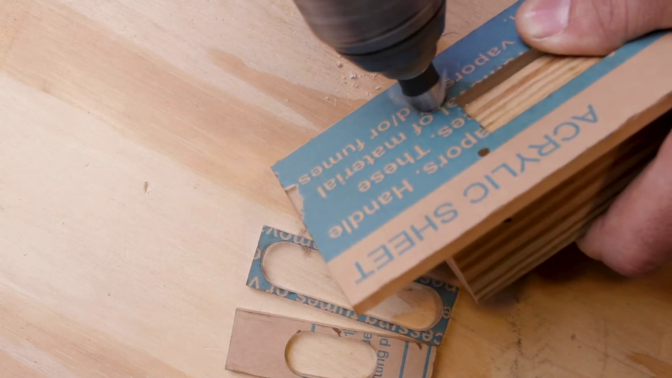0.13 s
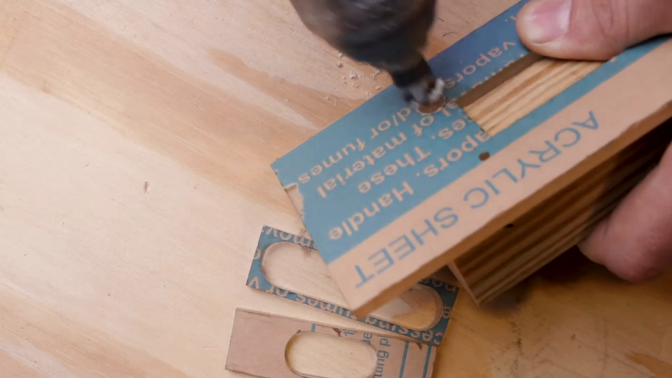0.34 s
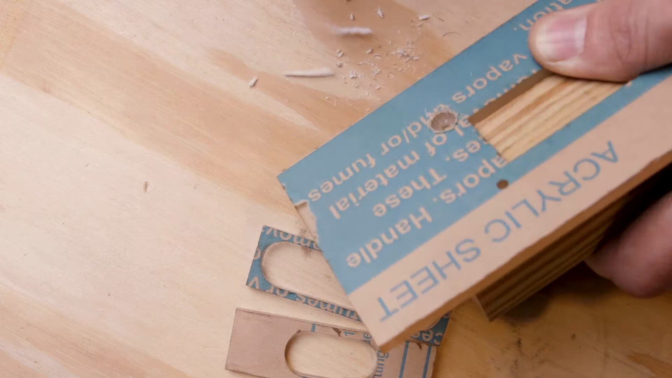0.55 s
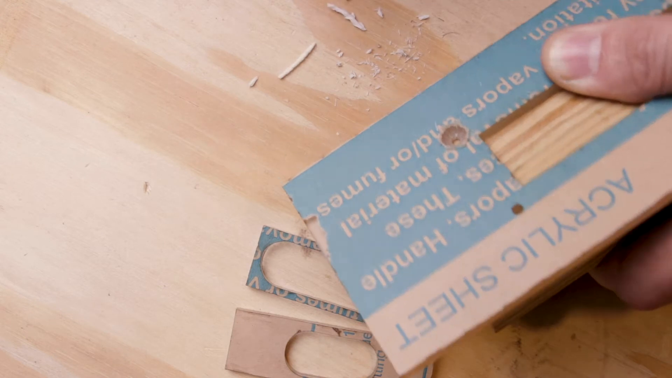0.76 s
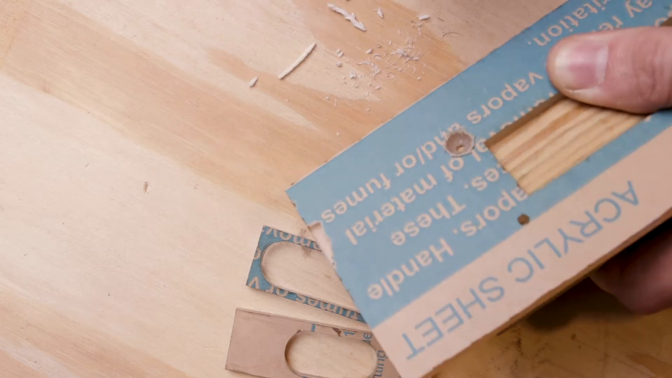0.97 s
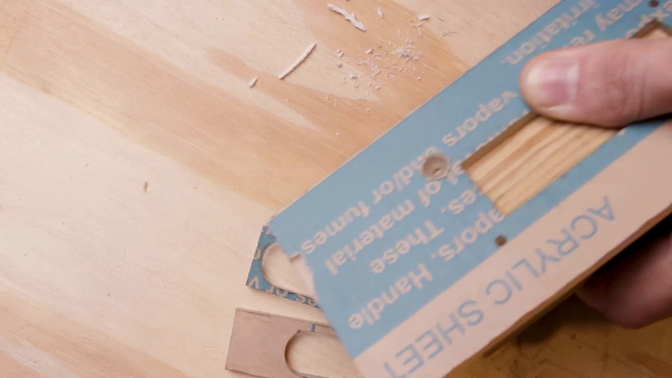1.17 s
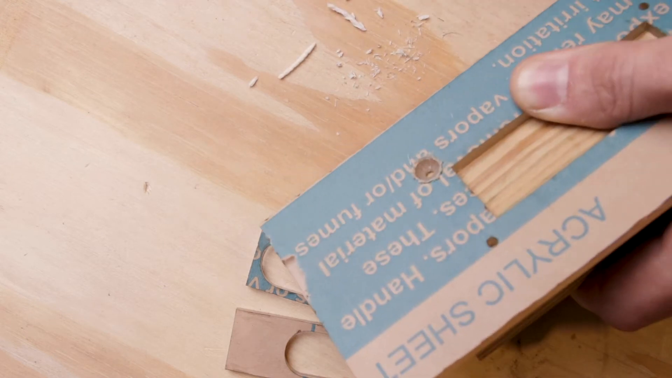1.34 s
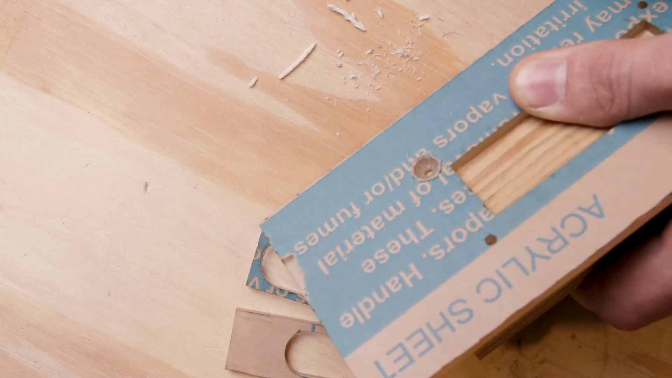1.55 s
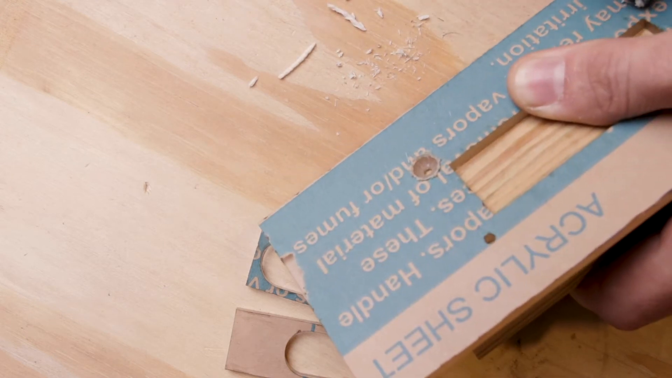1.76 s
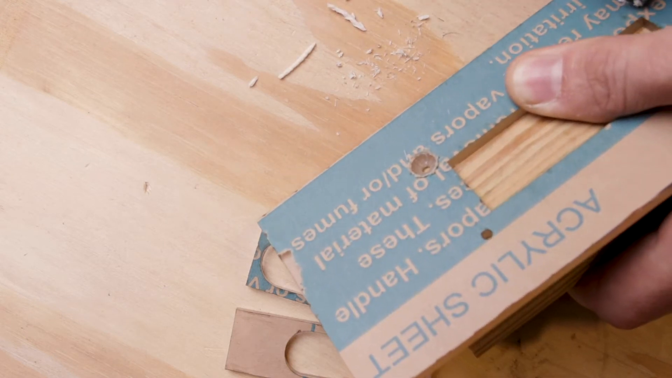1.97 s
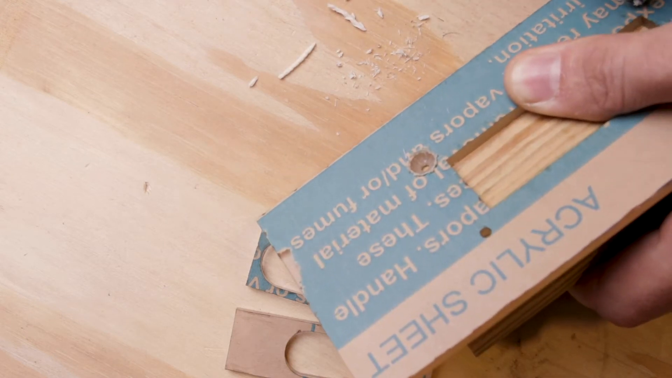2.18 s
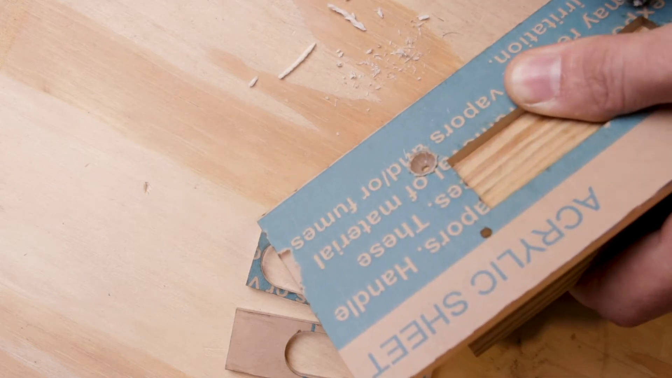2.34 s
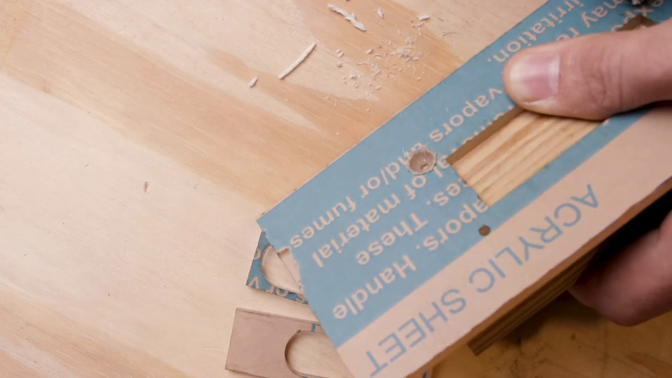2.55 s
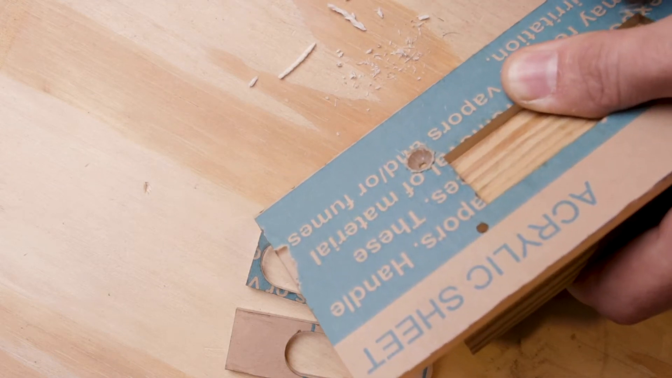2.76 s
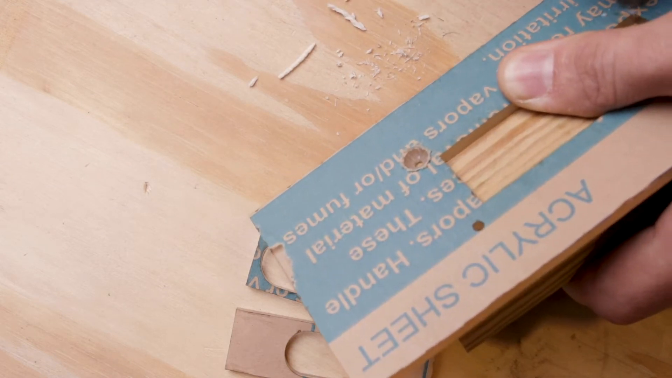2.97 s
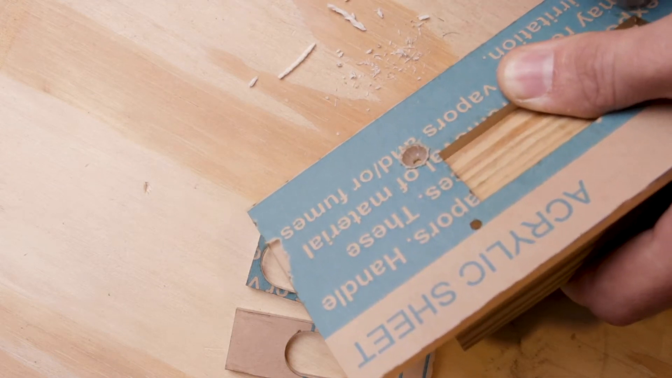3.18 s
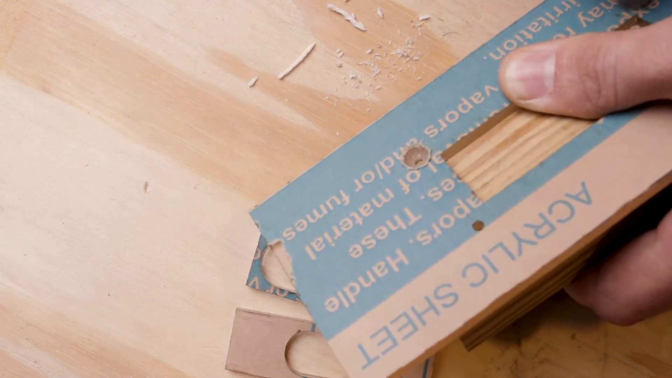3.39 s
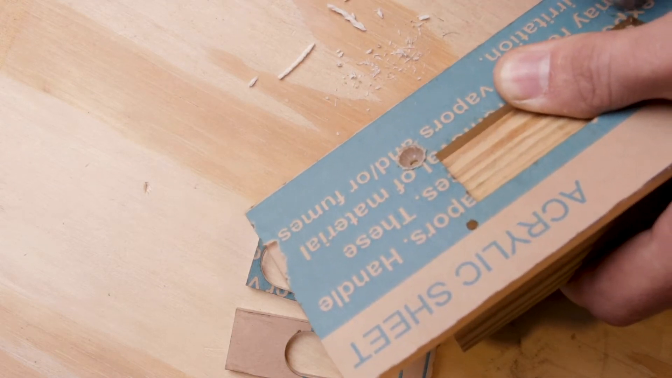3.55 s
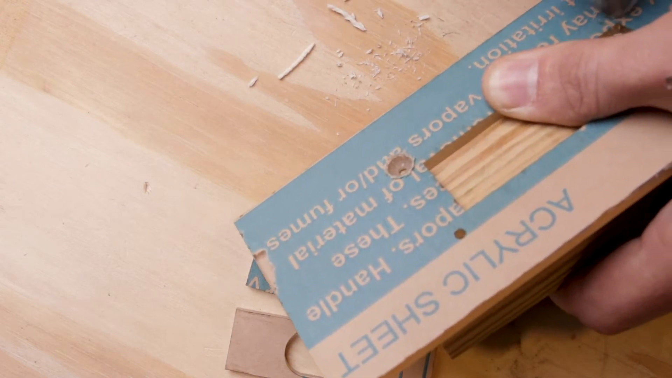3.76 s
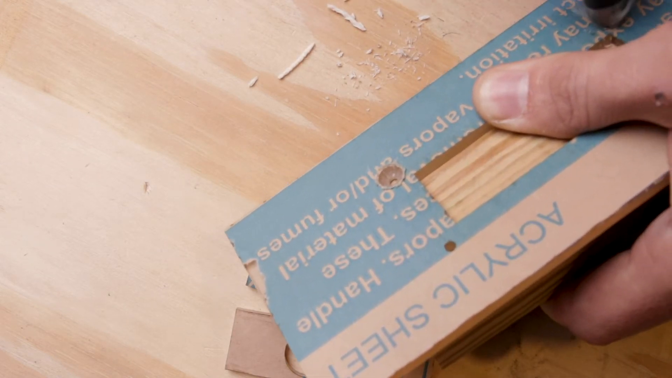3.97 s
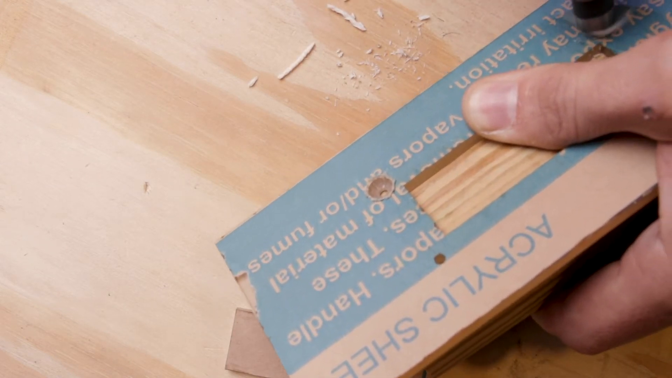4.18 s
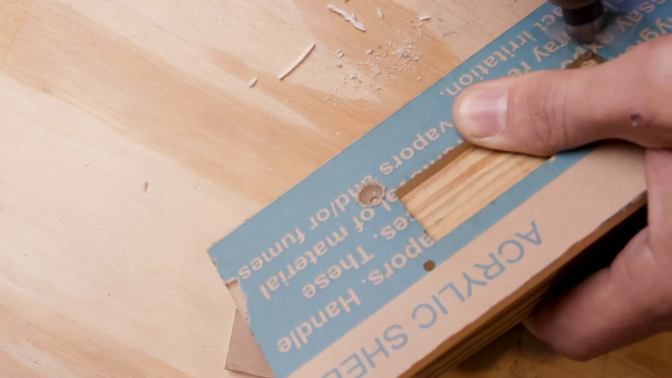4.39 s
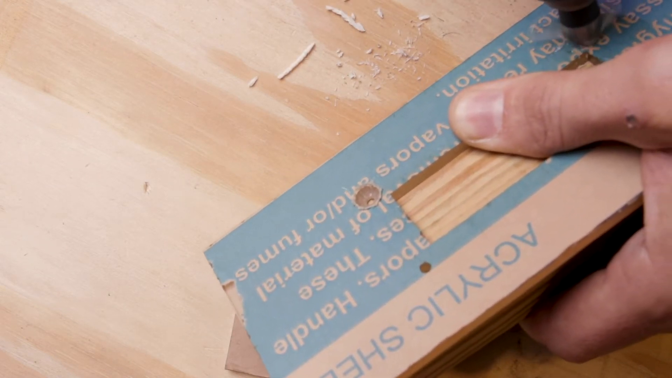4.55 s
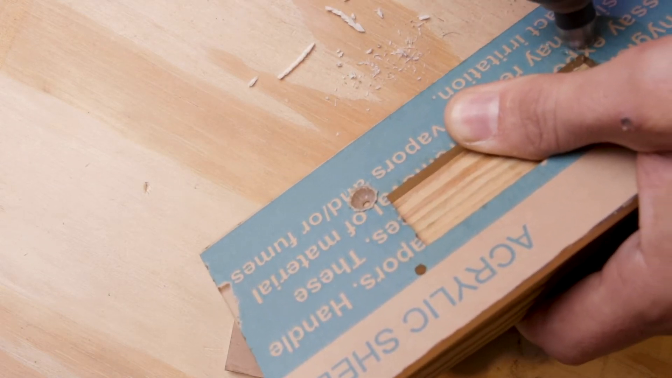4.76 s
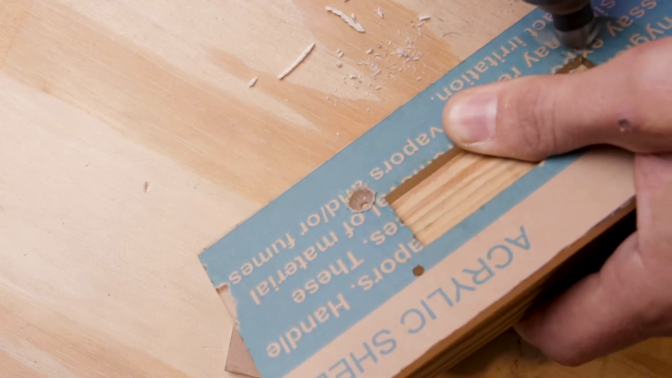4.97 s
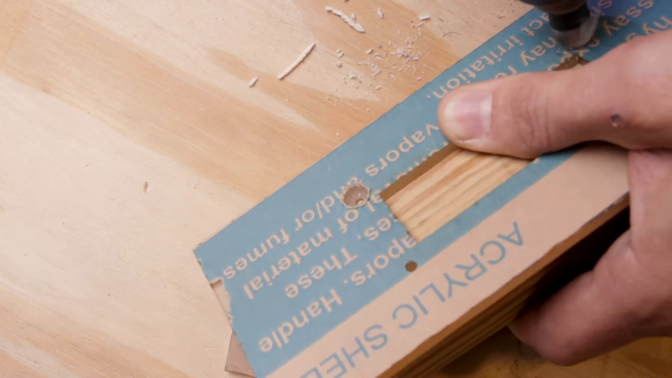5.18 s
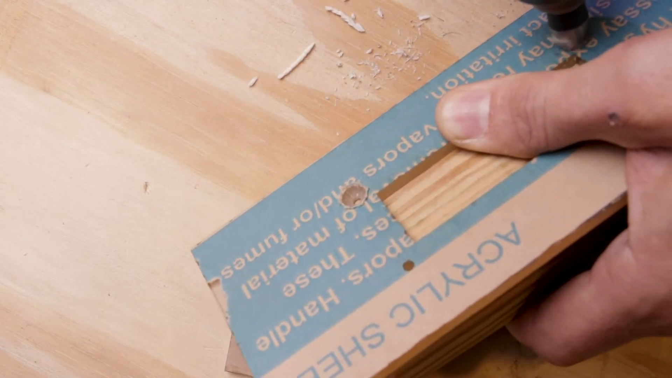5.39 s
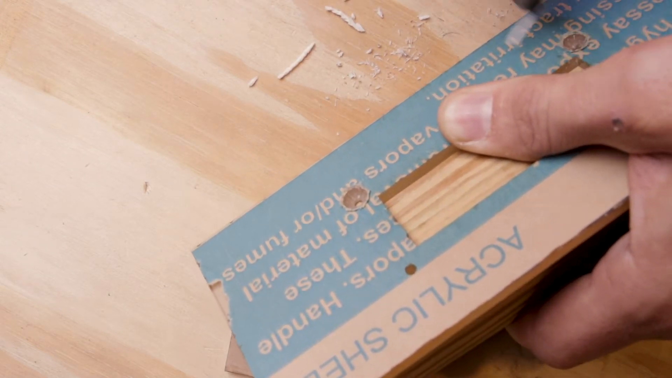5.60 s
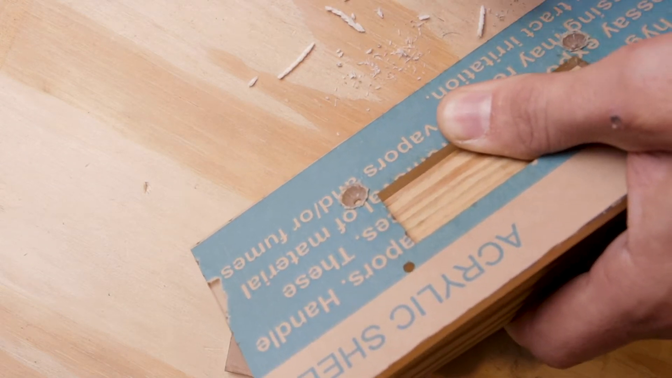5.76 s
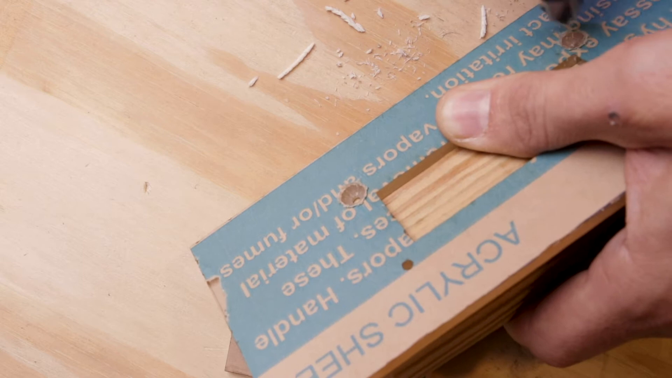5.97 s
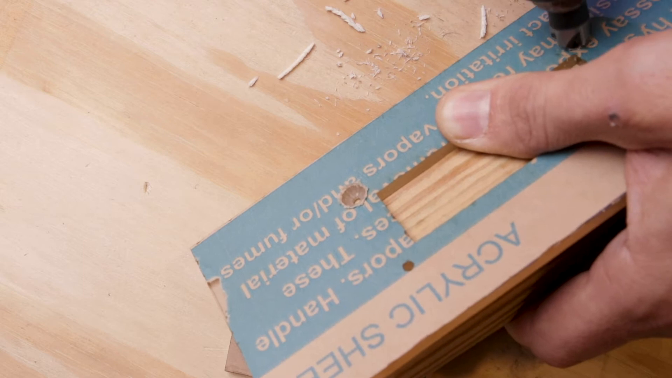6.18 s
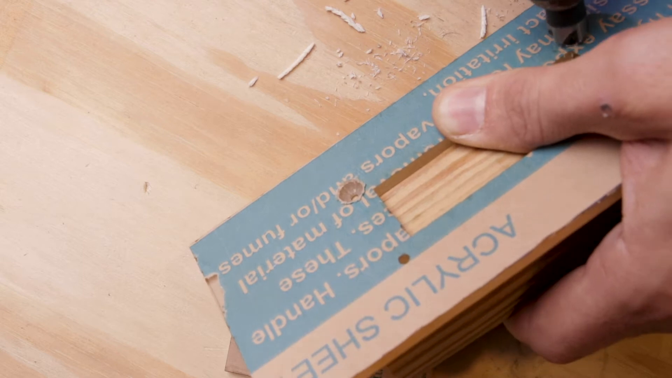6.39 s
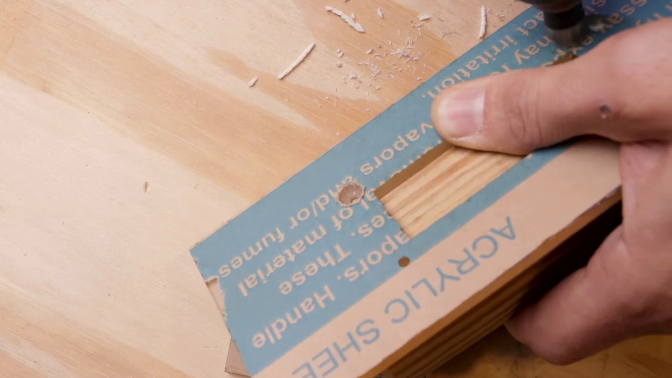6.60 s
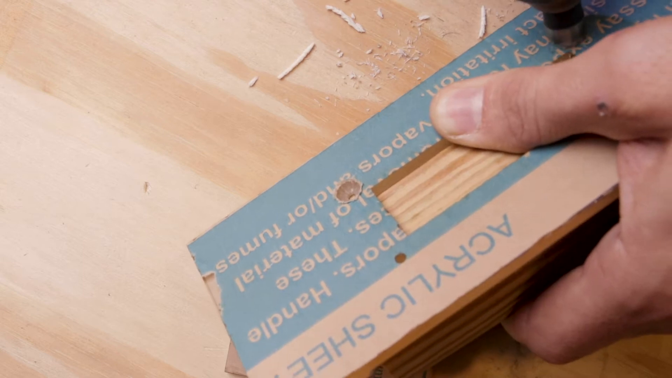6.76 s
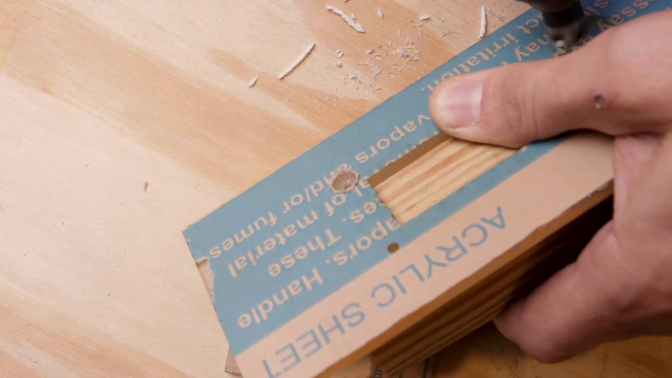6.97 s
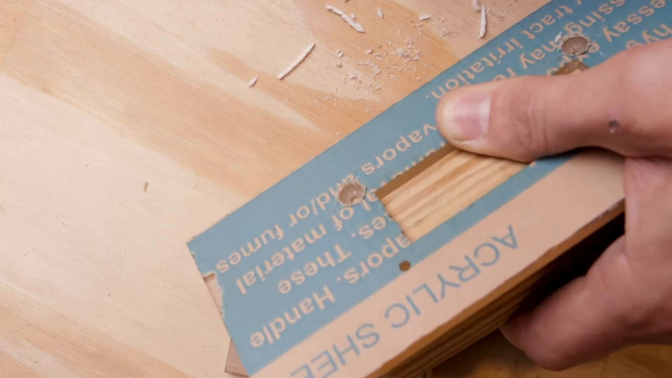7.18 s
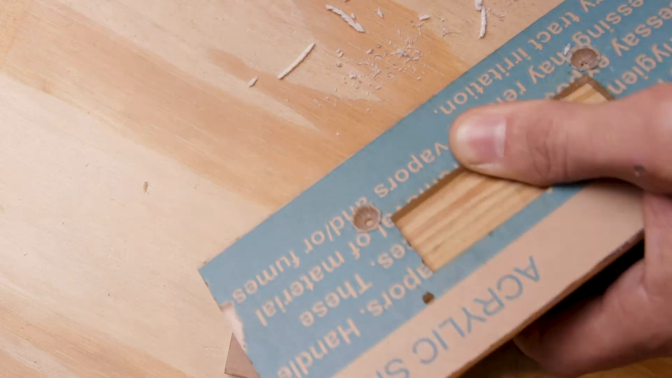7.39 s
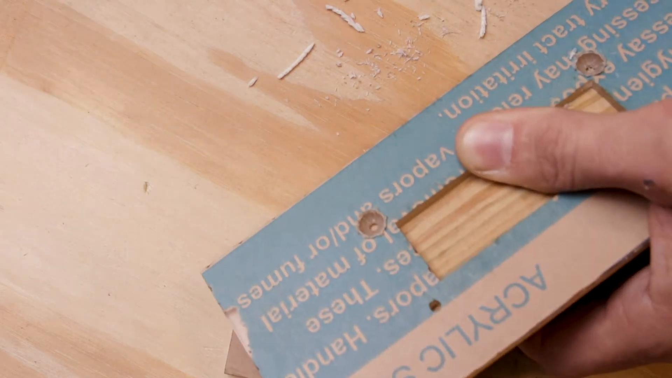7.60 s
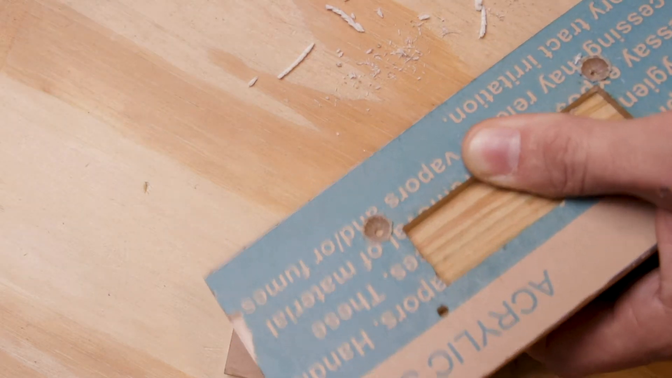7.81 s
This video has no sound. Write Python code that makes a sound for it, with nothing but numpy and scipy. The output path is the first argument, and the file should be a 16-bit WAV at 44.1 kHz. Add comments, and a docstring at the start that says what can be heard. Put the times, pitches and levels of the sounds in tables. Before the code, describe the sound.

A close, slightly reverberant workshop with faint hiss. A cordless drill is already running, a coarse geared growl around 150 turns per second, catching and stopping at 0.3 s with a sharp metallic clack. Quiet follows: a tiny tap at 0.56, a short dull wooden scrape at 1.1-1.3, then knocks and low bench bumps from 1.74 to 2.23. At 2.53 a thin high electric whine and several clacks lead into a fast, bright, rattling run. The bit rasps on plastic around 3 s; from 3.6 the motor sags steadily to a lower, throbbing growl, with woody tonal catches at 3.85 and 4.95, stopping near 5.5 with clacks and light rumble. Small knocks come at 6.13-6.35. The drill starts again at 6.4, brisk and higher, lifting at 6.85 and ending in a loud clack at 6.97. Faint ticks precede a hard double-edged knock with a dull thud at 7.49, then small taps until 7.83.

```python
"""A cordless drill chamfers three holes in an acrylic plate on a wooden block, close by in a workshop.
Noise bunched once a motor turn excites the gearbox; the rotor adds hum and overtones that follow its speed,
and the speed control whines as the motor spins up. The spindle lock clacks as bursts of filtered noise.
In between, the block slides and knocks on the bench: coloured noise and decaying modes, over a faint hiss."""
import sys
import numpy as np
from scipy import signal
from scipy.fft import rfft, irfft
from scipy.io import wavfile
from scipy.ndimage import map_coordinates

SR = 44100
rng = np.random.default_rng(int(sys.argv[2]) if len(sys.argv) > 2 else 0)


def digitize_waveform(pressure):
    """Quantize a signal to 16-bit integers and store it at the path in sys.argv[1].

    Rows of a 2-D input are taken as channels; values are limited to [-1, 1].
    """
    field = np.atleast_2d(pressure).T
    bounded = np.clip(field, -1, 1)
    quanta = np.round(bounded * 32767).astype(np.int16)
    wavfile.write(sys.argv[1], SR, quanta)


N = 345744
T = np.arange(N) / SR  # time of each sample [s]
TOP_SPEED = 290  # speed that the whine and the treble are scaled to [turns/s]

# Response of the gearbox: (frequency [Hz], relative level [dB per Hz])
GEARBOX_SPECTRUM = [(240, -30), (400, -2), (474, -7), (588, -5), (687, -7.5), (753, -3.5), (852, -5),
                    (1160, -0.9), (1530, -5.5), (2050, -2.5), (4440, -5.5), (5270, -9.5), (9180, -7),
                    (12500, -13.5), (16000, -23.5)]
# Response to dull blows: (frequency [Hz], relative level [dB])
THUD_SPECTRUM = [(15, -55), (30, -38), (70, -14), (140, 0.5), (250, -1.5), (330, -1), (500, -24.5),
                 (1200, -50)]
# Modes of chuck and bit: (frequency [Hz], relative level [dB], decay time t60 [s])
STEEL_MODES = [(3860, -31, 0.15), (5620, -25, 0.32), (11950, -29.5, 0.2)]
# The bit catches on the rim of the hole: (time [s], block tone [dB], rise of the rattle [dB])
RIM_CATCHES = [(.288, -31, 0), (2.715, -28, 0), (2.87, -45, 1.5), (3.85, -27, 1.5), (4.95, -32, 3),
               (5.47, -31, 0), (6.96, -27.5, 1)]
# The trigger is pulled: (trigger [s], gears engage [s], half speed [s], whine [dB], its octave [dB],
# loose gears [dB])
TRIGGER_PULLS = [(-.6, -.5, -.45, -30, -30, -40), (2.525, 2.62, 2.705, -25.5, -22, -33.5),
                 (6.403, 6.462, 6.512, -30.5, -33.5, -41)]
# Each hole: (rattle [dB], treble [dB], hum [dB], overtones [dB], share of the rattle that repeats
# every turn [0-1], block chatter [dB])
HOLE_SETTINGS = [(-23.2, -1, -2.8, 2, .3, -45), (-23.4, 0, .5, -1, .04, -41.5),
                 (-22.7, .8, 1, 1.5, .07, -47)]
# The trigger is let go: (bit lifts [s], lift time [s], motor stops [s], gears running down [dB],
# their fall [dB/s], housing rumble [dB], after-ring [dB])
TRIGGER_RELEASES = [(.268, .012, .312, -29, 270, -47, -7), (5.455, .012, 5.525, -29, 270, -62, -8),
                    (6.85, .06, 6.955, -29, 175, -49, 4)]


def amp(db):
    """Amplitude ratio: 20 dB for each factor of ten."""
    return 10 ** (np.asarray(db) / 20)


def unit(x):
    """Normalization: scales a signal to rms 1."""
    return x / np.sqrt(np.mean(x ** 2) + 1e-20)


def read(points, hz):
    """Spectral interpolation on a log-frequency axis."""
    f, value = np.transpose(points)
    return np.interp(np.log(hz + 1), np.log(f + 1), value)


def add(mix, s, sound):
    """Superposition: adds a sound into the mix at time s."""
    part = mix[max(round(s * SR), 0):][:len(sound)]
    part += sound[:len(part)]


def step(x):
    """Sigmoid transition from 0 to 1 around x = 0."""
    return .5 + .5 * np.tanh(x / 2)


def between(start, end, edge_s=.0034):
    """Gating: a linear-edged window from start to end."""
    return np.clip(np.minimum(T - start, end - T) / edge_s + 1, 0, 1)


def curves(rows):
    """Linear interpolation: a soft gate over the span of the rows, then every column at each sample."""
    s, *columns = np.transpose(rows)
    return [between(s[0], s[-1])] + [np.interp(T, s, column) for column in columns]


def level(rows):
    """Amplitude envelope interpolated in decibels, silent outside its rows."""
    gate, db = curves(rows)
    return gate * amp(db)


def colour(x, spectrum, size=2048):
    """Minimum-phase filtering: the log gain fixes the phase of a causal response, here of unit energy."""
    hz = abs(np.fft.fftfreq(size, 1 / SR))
    log_gain = np.log(amp(np.maximum(read(spectrum, hz), -90)))
    taps = np.fft.ifft(np.exp(np.conj(signal.hilbert(log_gain)))).real
    taps = taps / np.linalg.norm(taps)
    return np.apply_along_axis(signal.oaconvolve, -1, x, taps)[..., :x.shape[-1]]


def resonate(x, hz, width):
    """Single resonance of gain 1 at its peak; width is its bandwidth [Hz]."""
    return signal.lfilter(*signal.iirpeak(hz, hz / width, SR), x)


def treble(x, hz=5000):
    """Zero-phase high-pass: the part of x above hz."""
    return signal.sosfiltfilt(signal.butter(2, hz, "high", fs=SR, output="sos"), x)


def wander(per_s):
    """Random modulation of rms 1, interpolated between per_s chance values a second."""
    knots = rng.standard_normal(N // 16)
    return unit(map_coordinates(knots, [T * per_s], order=1, mode="wrap"))


def ring(modes, t):
    """Modal decay: a sum of exponentially dying sines."""
    return sum(amp(db - 60 * t / t60) * np.sin(2 * np.pi * hz * t) for hz, db, t60 in modes)


def grains(spread_db):
    """Dense impact noise of uneven size: both channels share the sizes, each draws its own values."""
    size_db = spread_db * np.minimum(rng.exponential(1, N), 5)
    return unit(rng.standard_normal((2, N)) * amp(size_db))


def widen(pair):
    """Interchannel coherence: bass reaches both microphones more alike than treble."""
    # (frequency [Hz], left-right likeness [0-1])
    likeness = [(100, 0.94), (300, 0.7), (700, 0.6), (2000, 0.69), (5000, .6), (10000, 0.5), (16000, .3)]
    alike = np.clip(read(likeness, np.fft.rfftfreq(N, 1 / SR)), 0, 1)
    mid, side = rfft(pair) * np.sqrt([(1 + alike) / 2, (1 - alike) / 2])
    return irfft(np.array([mid + side, mid - side]), N)


def per_hole(rows):
    """Piecewise-constant control: every column of the current hole's row at each sample."""
    triggers = [row[0] for row in TRIGGER_PULLS]
    return np.array(rows)[np.searchsorted(triggers, T, "right") - 1].T


def motor(spin_up_s=.081):
    """Rotor inertia smooths the spin-up: gate, spin-up done, acceleration, lift (all 0-1), turns/s."""
    # Speed that trigger and load allow, sagging as the bit is pressed in: (time [s], speed [turns/s])
    allowed_speed = [(0, 150), (.32, 153), (2.5, 287), (3.56, 287), (3.7, 266), (3.8, 241), (4, 184),
                     (4.1, 169), (4.6, 147), (5, 142), (5.4, 125), (5.55, 113), (6.4, 260), (6.87, 260),
                     (6.97, 250)]
    _, engage, half = per_hole(TRIGGER_PULLS)[:3]
    lift, lift_s, stop = per_hole(TRIGGER_RELEASES)[:3]
    spin = step((T - half) / spin_up_s)
    surge = (4 * spin * (1 - spin)) ** 2
    speed = spin * curves(allowed_speed)[1]
    return between(engage, stop), spin, surge, step((T - lift) / lift_s), speed


def hiss(floor_db=-70.3, top_db=-54):
    """Stationary background noise, raised at a steady rate in decibels during each pause."""
    # Spectrum of the background: (frequency [Hz], relative level [dB])
    air_spectrum = [(15, -33.5), (25, -9.5), (64, -0.5), (149, -1), (190, -5), (229, -11), (373, -4),
                    (405, -6), (659, -7.5), (1020, -16.5), (1160, -13.5), (4870, -26), (10700, -23.5),
                    (16000, -34)]
    # (start [s], end [s], rise [dB/s])
    swells = [(.83, 2.55, 12.5), (5.85, 6.45, 22), (7.12, 7.84, 18)]
    rise_db = sum(rate * (T - start) * (T > start) * (T < end) for start, end, rate in swells)
    noise = colour(widen(rng.standard_normal((2, N))), air_spectrum)
    return amp(np.minimum(floor_db + rise_db, top_db)) * noise


def drill(depth=0.38, flutter_db=0.9, grain_db=2.0, usual_treble_db=-4, body_db=-15, rattle_db=0,
          hum_db=-1, rasp_hz=2700, rasp_width=900, unsteady_db=.4, hum_surge_db=4, gear_db=-22):
    """Periodic excitation: gear impacts bunch once a turn; hum and overtones follow shaft speed."""
    # Motor and gear overtones: (multiple of shaft speed, level against the rattle [dB])
    orders = [(2, -20.5), (3, -26), (4, -19), (5, -21), (6, -25), (7, -25.5), (8, -30), (9, -29), (13, -27)]
    # Response of the housing: (frequency [Hz], relative level [dB])
    housing_spectrum = [(60, -27.5), (130, -6), (230, -10.5), (330, -2.5), (430, -7), (600, -18.5),
                        (1000, -43)]
    # Resonances of tool and block that overtones glide through: (frequency [Hz], gain [dB])
    shell_gain = [(240, -3), (295, -1), (318, 12), (345, 10), (390, 2), (530, -10), (575, -9), (620, -1),
                  (760, 0), (900, 2), (1000, -4), (1060, 5), (1140, 5), (1220, -2), (1300, -4), (2500, -6)]
    # The cutting edge rasps on the acrylic: (time [s], level [dB])
    rasp_level = [(2.85, -46), (3.0, -31.5), (3.45, -35), (3.65, -46), (3.9, -58)]
    # Hum raised in block and bench by the rotor's unbalance: (turn rate [Hz], relative level [dB])
    unbalance = [(75, -47), (105, -35.5), (130, -27), (142, -30), (150, -29), (168, -35), (210, -43),
                 (250, -41.5), (275, -39), (288, -46)]
    surge_db, crawl_db, lift_db, lift_hum_db = 6.5, -4.5, -5.5, -10
    slow_treble_db, fast_treble_db, lift_treble_db = -7, -.6, 2.5
    catch_s, gear_order = .045, 1.165

    gate, spin, surge, lifted, speed = motor()
    run_db, run_treble_db, run_hum_db, tone_db, repeat, _ = per_hole(HOLE_SETTINGS)
    repeat = np.clip(repeat, 0, 1)
    catch_db = sum(rise_db * np.exp(-((T - s) / catch_s) ** 2) for s, _, rise_db in RIM_CATCHES)
    db = run_db + crawl_db * (1 - spin) + surge_db * surge + lift_db * lifted
    db = db + catch_db + unsteady_db * wander(25)
    treble_db = slow_treble_db + (fast_treble_db - slow_treble_db) * speed / TOP_SPEED
    treble_db = run_treble_db + treble_db + lift_treble_db * lifted
    unbalance_db = run_hum_db + read(unbalance, speed) + hum_surge_db * surge + lift_hum_db * lifted

    speed = speed * (1 + .006 * wander(60))
    turns = np.cumsum(speed) / SR
    angle = 2 * np.pi * turns
    # the same tooth flaws come round every turn; the rest of the rattle is chance
    flaws = rng.standard_normal(256)
    pattern = unit(np.interp(turns % 1, np.linspace(0, 1, len(flaws)), flaws))
    # single turns stand out more when the motor is slow
    slow_depth = depth * np.minimum(150 / speed, 1.2)
    bunch = unit(np.exp(slow_depth * (np.cos(angle) + 0.18 * np.cos(2 * angle))))

    impacts = np.sqrt(1 - repeat) * widen(grains(grain_db)) + np.sqrt(repeat) * pattern
    rattle = colour(impacts * bunch * amp(flutter_db * wander(220)), GEARBOX_SPECTRUM)
    rattle = rattle + (amp(treble_db - usual_treble_db) - 1) * treble(rattle)
    shake, chips = grains(3.0) * bunch
    body = amp(body_db) * colour(shake, housing_spectrum)
    rasp = unit(resonate(chips * amp(1.9 * wander(300)), rasp_hz, rasp_width))
    rasp = level(rasp_level) * rasp

    overtones = np.zeros(N)
    for order, order_db in [*orders, (gear_order, gear_db)]:
        strength = amp(order_db + read(shell_gain, order * speed)) * (1 + .35 * wander(30))
        overtones += strength * np.sin(order * angle + 2 * np.pi * rng.random())
    hum = amp(unbalance_db + hum_db) * np.sin(angle) * (1 + 0.027 * wander(40))
    noise = amp(db) * (amp(rattle_db) * rattle + body) + rasp
    tones = np.sqrt(2) * (amp(db + tone_db) * overtones + hum)
    return gate * (noise + tones)


def whine(third_db=-17, running_db=-34.5, running_octave_db=-47, build_db_per_s=68, fade_power=1.7):
    """Chopped motor current makes the windings sing, most at low rotor speed and not at full speed."""
    switch_hz = 3922.5
    trigger, engage, _, first_db, second_db, _ = per_hole(TRIGGER_PULLS)
    _, spin, surge, _, speed = motor()
    build = amp(-build_db_per_s * np.maximum(engage - T, 0))
    starting = (1 - spin) ** fade_power * build
    chopped = spin * np.maximum(1 - speed / TOP_SPEED, 0)
    first = amp(first_db) * starting * (1 + surge) + amp(running_db) * chopped
    second = amp(second_db) * starting * (1 - spin) + amp(running_octave_db) * chopped
    angle = 2 * np.pi * switch_hz * T + 0.14 * wander(300)
    upper = np.sin(2 * angle) + amp(third_db) * np.sin(3 * angle)
    tones = first * np.sin(angle) + second * upper
    gate = between(trigger, per_hole(TRIGGER_RELEASES)[2], edge_s=.002)
    return gate * np.sqrt(2) * tones * (1 + 0.17 * wander(150))


def chatter(swell_s=.012, fade_db_per_s=300):
    """Sustained vibration: the bit keeps one block mode going, unsteady and swelling at each catch."""
    chatter_hz = 340
    angle = 2 * np.pi * np.cumsum(chatter_hz + 10 * wander(60)) / SR
    catches = np.zeros(N)
    for s, db, _ in RIM_CATCHES:
        swell = np.exp(np.minimum(T - s, 0) / swell_s)
        catches += amp(db - fade_db_per_s * np.maximum(T - s, 0)) * swell
    strength = amp(per_hole(HOLE_SETTINGS)[-1]) * motor()[0] + catches
    return strength * np.sqrt(2) * np.sin(angle) * (1 + .35 * wander(50))


def slack(take_up_s=.028, jolt_s=.012, rumble_s=.115, rumble_fade_s=.015):
    """Backlash: loose gears chatter and jolt the housing at a start, then run down and rumble at a stop."""
    trigger, engage, *_, loose_db = per_hole(TRIGGER_PULLS)
    stop, run_down_db, fall_db_per_s, rumble_db = per_hole(TRIGGER_RELEASES)[2:6]
    teeth = colour(widen(grains(1.9)), GEARBOX_SPECTRUM)
    housing = colour(grains(5.0)[0], THUD_SPECTRUM)
    take_up = between(trigger, engage) * np.minimum((T - trigger) / take_up_s, 1) ** 2
    jolt = np.exp(-abs(T - engage) / jolt_s)
    since = np.maximum(T - stop, 0)
    run_down = amp(run_down_db - fall_db_per_s * since) * teeth
    rumble = amp(rumble_db) * step((rumble_s - since) / rumble_fade_s) * housing
    return amp(loose_db) * (take_up * teeth + jolt * housing) + (T > stop) * (run_down + rumble)


def after_ring():
    """Free decay: faint tones hang on after each stop."""
    # (frequency [Hz], relative level [dB], decay time t60 [s])
    faint_modes = [(258.4, -53, 0.9), (1080, -59, 0.95)]
    out = np.zeros(N)
    for _, _, stop, *_, after_db in TRIGGER_RELEASES:
        add(out, stop, amp(after_db) * ring(faint_modes, T[:SR]))
    return out


def clacks(fall_s=0.0018, rise_s=0.00057, steel_db=-11.5):
    """Impact excitation: lock rollers slam home in flurries of a few milliseconds and ring the steel."""
    # Response to the flurries: (frequency [Hz], relative level [dB])
    clack_spectrum = [(120, -47.5), (200, -18.5), (456, -17), (791, -11), (1770, -10), (2560, -4),
                      (4430, -0.5), (5040, -12.5), (5940, -3.5), (8120, -5.5), (10900, -7), (14300, -10.5),
                      (16000, -21)]
    # Spindle lock and gear teeth: (time [s], level [dB], length before the fall [s])
    slams = [(0.3268, -12.5, 0.0042), (0.348, -34, 0.0041), (2.556, -10, 0.0028), (2.5605, -27.5, .003),
             (2.6063, -9, 0.0022), (2.627, -27, .002), (2.648, -12.5, 0.0007), (5.539, -12.5, 0.0049),
             (5.562, -22, .002), (5.5876, -26.5, 0.0042), (6.4246, -17.5, 0.006), (6.449, -15.5, 0.0038),
             (6.9675, -8.5, .0036)]
    force, steel, t = np.zeros(N), np.zeros(N), T[:SR // 3]
    for s, db, length in slams:
        fall = np.exp(-np.maximum(t - length, 0) / fall_s)
        add(force, s, amp(db) * np.minimum(t / rise_s, 1) * fall)
        add(steel, s, amp(db + steel_db) * ring(STEEL_MODES, t))
    return colour(widen(force * rng.standard_normal((2, N))), clack_spectrum) + steel


def knocks(click_s=0.0038, rise_s=0.0004, thud_s=0.018, click_db=2, thud_db=-3, push=9, steel_db=4,
           usual_treble_db=-8):
    """Impact and modal response: a hard click and a dull push leave the block ringing."""
    # Response to hard contact: (frequency [Hz], relative level [dB])
    tap_spectrum = [(240, -30), (400, -0.5), (645, -7.5), (1930, -5.5), (2320, -5.5), (2930, -7.5),
                    (4310, -7), (4950, -11.5), (12500, -10.5), (16000, -43)]
    # Plate, block and drill on the bench:
    # (time [s], relative click [dB], relative thud [dB], relative treble share [dB])
    blows = [(0.564, -58.5, -78, -9), (1.737, -33, -41, -20.5), (2.001, -42, -48, -13),
             (2.03, -47.5, -47, -12.5), (2.162, -50, -44, -14), (2.186, -29.5, -35, -24),
             (2.231, -61, -40.5, -22), (6.13, -33.5, -34.5, -34), (6.137, -46.5, -46, -4),
             (6.199, -44, -47, -15), (6.2219, -34, -52, -10), (6.3, -26.5, -27, -19),
             (6.325, -44, -44, -18), (6.35, -52.5, -43.5, -9), (7.379, -46.5, -62.5, -20.5),
             (7.395, -53, -56, -12), (7.408, -54, -64, -12), (7.487, -32, -12, -16),
             (7.4909, -13, -26.5, -15), (7.4945, -10, -27, -11), (7.526, -31, -31.5, -0.5),
             (7.547, -44, -28, -6), (7.58, -52.5, -39, -18), (7.828, -47, -58, -2)]
    # Modes of the block: (frequency [Hz], relative level [dB], decay time t60 [s])
    block_modes = [(342, -3.5, .19), (133.7, -6, .12)]
    force, body, t = np.zeros((2, N)), np.zeros(N), T[:SR // 3]
    for s, hard_db, soft_db, treble_db in blows:
        contact = amp(hard_db + click_db) * (1 - np.exp(-t / rise_s)) * np.exp(-t / click_s)
        add(force[0], s, contact)
        add(force[1], s, contact * amp(treble_db - usual_treble_db))
        shove = push * (t == 0) + 0.59 * rng.standard_normal(len(t)) * np.exp(-t / thud_s)
        dull_push = colour(shove, THUD_SPECTRUM) + ring(block_modes, t)
        add(body, s, amp(soft_db + thud_db) * dull_push)
        # doubling the decibels lets only a hard blow wake the steel
        add(body, s, amp(2 * hard_db + steel_db) * ring(STEEL_MODES, t))
    grit = widen(rng.standard_normal((2, N)))
    dull, bright = (colour(grit * f, tap_spectrum) for f in force)
    return dull - treble(dull) + treble(bright) + body


def slide():
    """Friction noise: the block slides over the bench as dense grains, coloured by its resonances."""
    # (time [s], level [dB])
    slide_level = [(1.09, -75), (1.15, -53.5), (1.2, -55), (1.25, -64), (1.32, -81)]
    # (frequency [Hz], relative level [dB])
    scrape_spectrum = [(88, -52.5), (150, -14), (229, -21), (248, -33.5), (318, 1), (393, -20),
                       (1460, -14.5), (1700, -20), (2310, -27), (3400, -27), (4910, -39), (6550, -28.5),
                       (15000, -40)]
    return level(slide_level) * colour(widen(grains(3.0)), scrape_spectrum)


def bumps(bench_hz=128, t60=.13, rise_s=.003):
    """Damped low mode: the bench top booms briefly under the weight of the hand."""
    # Soft shoves of the block that only the bench top answers: (time [s], level [dB])
    shoves = [(2.025, -38), (2.188, -27), (2.23, -37)]
    out, t = np.zeros(N), T[:SR // 3]
    for s, db in shoves:
        add(out, s, ring([(bench_hz, db, t60)], t) * (1 - np.exp(-t / rise_s)))
    return out


def workshop(pair, tail_db=-11):
    """Reverberation: sparse random echoes decay by frequency, different at each microphone."""
    # (frequency [Hz], reverberation time t60 [s])
    room_decay = [(100, 0.27), (400, .3), (1500, 0.27), (5000, 0.23), (10000, 0.25), (16000, 0.067)]
    t = T[:SR // 2]
    signs = rng.choice([-1., 1.], (2, len(t)))
    taps = signs * (rng.random((2, len(t))) < 4000 / SR) * (t > .004)  # 4000 echoes/s after 4 ms
    hz, when, z = signal.stft(taps, SR, nperseg=256)
    decay = amp(-60 * when / read(room_decay, hz)[:, None])
    bass_cut = (hz / (hz + 300))[:, None]
    tail = signal.istft(z * decay * bass_cut, SR, nperseg=256)[1]
    tail = tail / np.linalg.norm(tail[0])
    return pair + amp(tail_db) * signal.oaconvolve(pair, tail, axes=1)[:, :N]


def place(pair, lag_s=.00002):
    """Interaural differences: level leans by frequency and the left channel lags a shade."""
    # (frequency [Hz], left minus right [dB])
    level_difference = [(60, 2.1), (290, -1), (640, 3), (1410, -3), (3100, -1), (6820, -2.5), (15000, -3.5)]
    hz = np.fft.rfftfreq(N, 1 / SR)
    lean = amp(read(level_difference, hz) / 2)
    lag = np.exp(-2j * np.pi * hz * lag_s)
    return irfft(rfft(pair) * np.array([lean * lag, 1 / lean]), N)


def scene():
    """Superposition of the drill, the handling of the block and the background."""
    tones = chatter() + whine() + after_ring()
    tool = drill() + slack() + clacks() + tones
    handling = knocks() + bumps() + slide()
    return place(workshop(tool, tail_db=-14)) + workshop(handling, tail_db=-12) + hiss()


def record(dry):
    """Clipping at full scale, then a linear-phase low-pass."""
    edge_hz = 16100
    low_pass = signal.firwin(401, edge_hz, window=("kaiser", 8), fs=SR)
    return signal.oaconvolve(np.clip(dry, -1, 1), low_pass[None], "same")


dry = scene()
out = record(dry)
digitize_waveform(out)
```